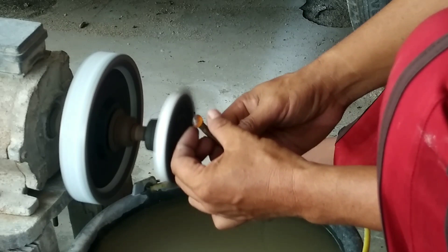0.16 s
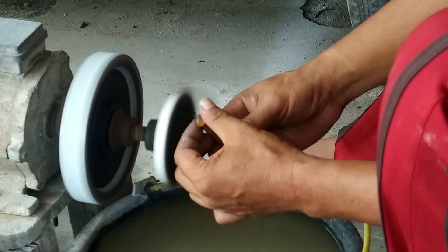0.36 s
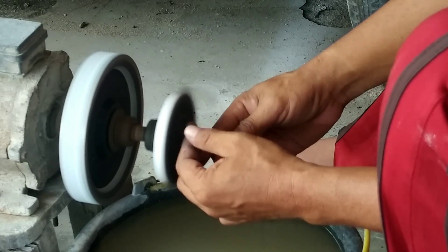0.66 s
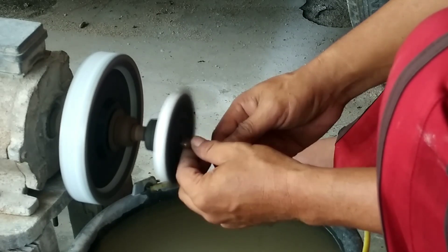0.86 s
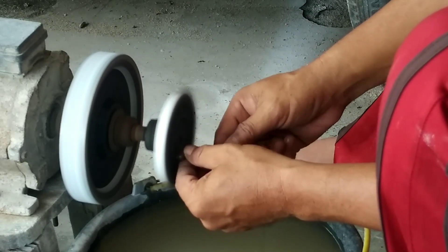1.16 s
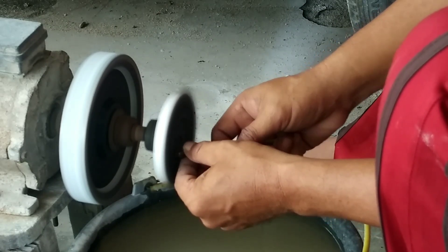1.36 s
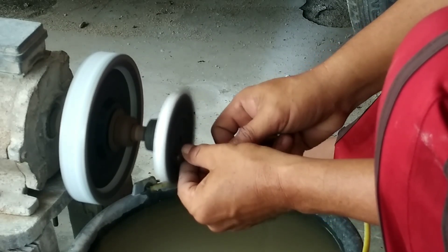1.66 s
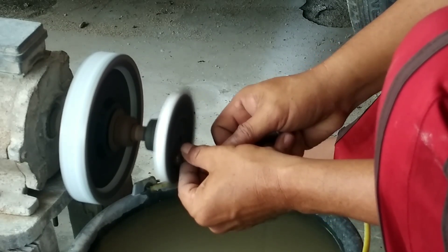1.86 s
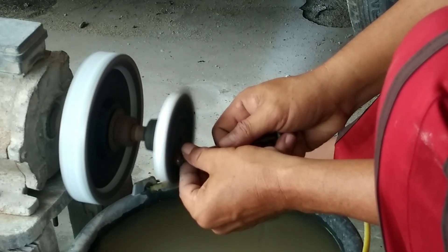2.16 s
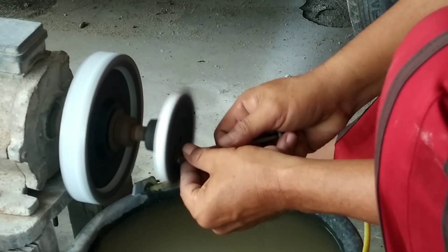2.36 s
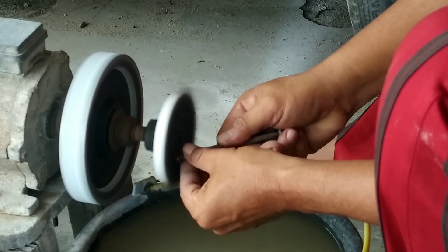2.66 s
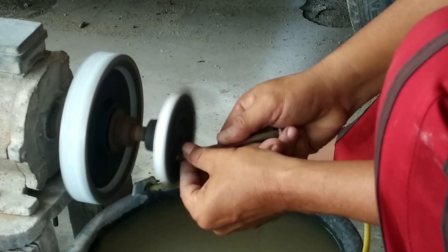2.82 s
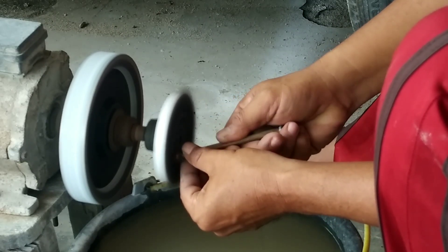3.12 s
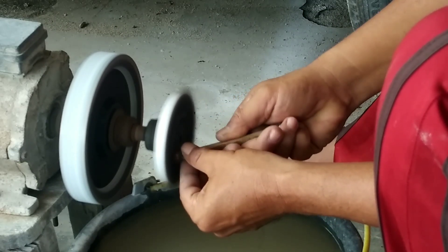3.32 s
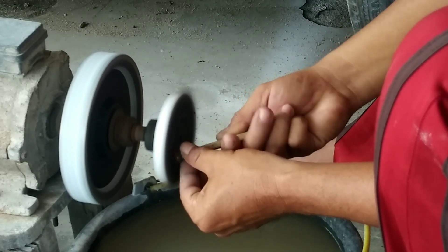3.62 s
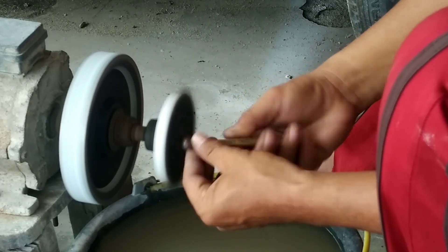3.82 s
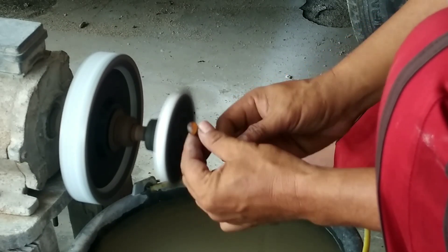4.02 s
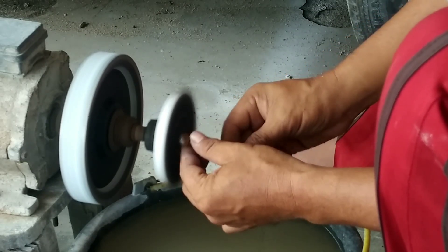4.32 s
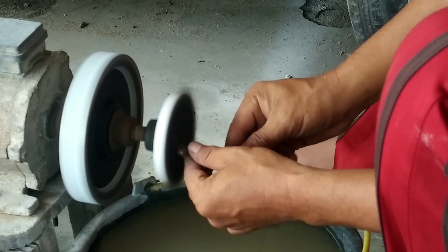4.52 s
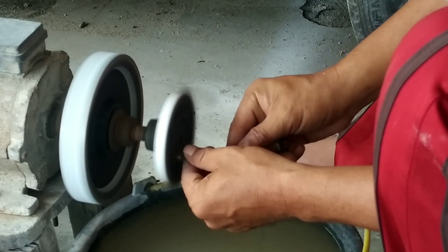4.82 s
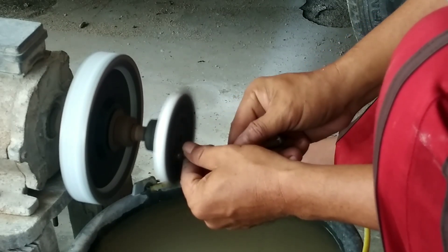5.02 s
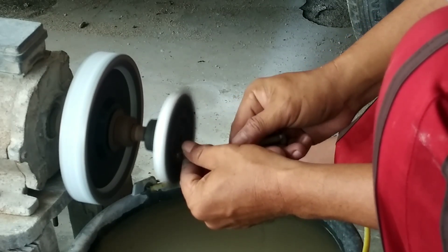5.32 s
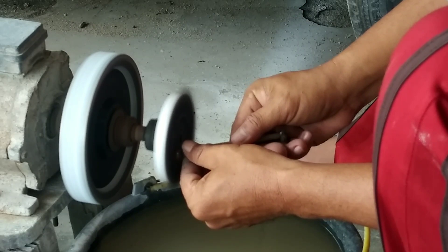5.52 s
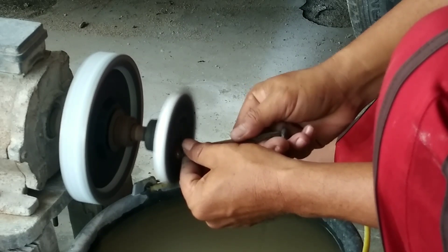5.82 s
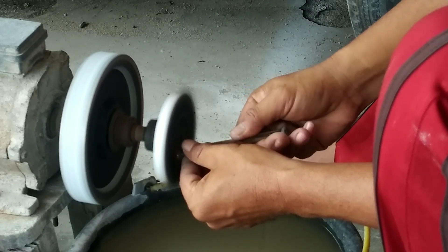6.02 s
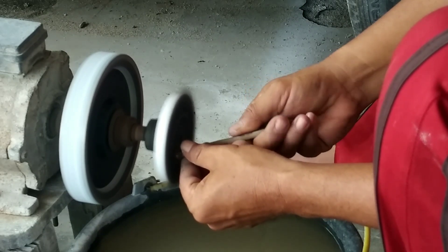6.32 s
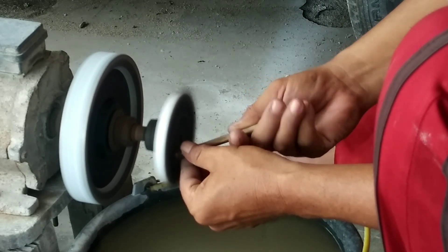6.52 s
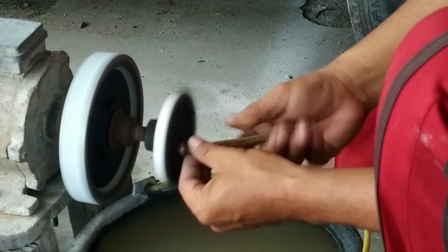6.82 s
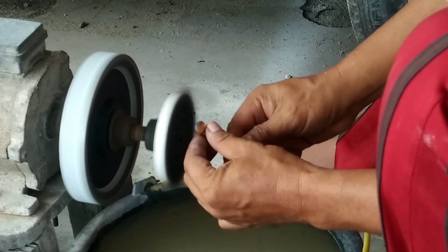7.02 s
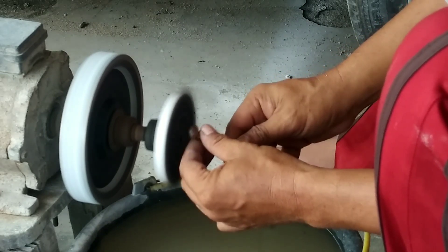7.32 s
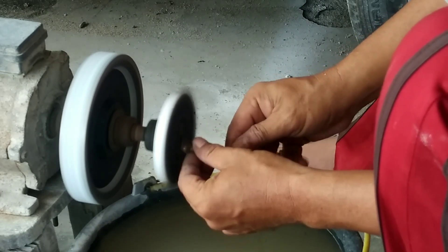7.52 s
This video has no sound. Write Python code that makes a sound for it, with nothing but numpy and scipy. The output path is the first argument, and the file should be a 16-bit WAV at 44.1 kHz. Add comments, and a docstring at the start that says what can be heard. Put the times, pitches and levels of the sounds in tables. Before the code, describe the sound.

Close in a hard workshop, a bench grinder runs without a break: a dense, nasal whine of many unsteady tones over rushing motor roar. A thin metallic ring flares up in irregular fits. A small stone touches the spinning wheel, giving faint airy hisses that swell and ease with hand pressure, strongest before three and four seconds. A distant engine hums low behind. Stereo, with dull extreme treble.

```python
"""Many unsteady tones sing over a broad roar: a bench grinder's shaft and ball bearing in their casing.
They are sums of wavering sines and shaped noise; the end shield rings in fits of narrow-band noise.
A stone on the wheel hisses under changing pressure: noise pulsing with each turn.
Behind it a far engine, a few sine orders, picks up speed and settles.
Two microphone ports hear each grinder tone with its own level and lag."""
import sys
import numpy as np
from scipy import signal
from scipy.fft import rfft, irfft, next_fast_len
from scipy.io import wavfile
from scipy.ndimage import uniform_filter1d

SR = 44100
rng = np.random.default_rng(int(sys.argv[2]) if len(sys.argv) > 2 else 0)


def generate_wav(signal):
    """Clip the signal to [-1, 1] and save it as 16-bit WAV at the path in sys.argv[1]."""
    frames = np.transpose(np.atleast_2d(signal))
    scaled = np.clip(frames, -1, 1) * 32767
    pcm = np.round(scaled).astype(np.int16)
    wavfile.write(sys.argv[1], SR, pcm)


def invert_db(x):
    """Field ratio 10**(x/20) for x, a level in decibels (scalar or array-like)."""
    u = np.asarray(x, float) / 20
    return 10 ** u


N = 338229

SHAFT_HZ, MAINS_HZ = 48.8, 100.2  # mean shaft speed; mains hum

# shaft speed: (time [s], deviation from mean [%])
SHAFT_SPEED = [(0, .01), (.5, .18), (1.4, .24), (1.85, .15), (2.35, -.09), (3.0, -.16), (3.6, -.27),
               (3.85, -.24), (4.25, .1), (4.9, .22), (5.3, .14), (5.85, -.04), (6.5, -.05), (6.9, -.11),
               (7.3, .13), (7.67, .2)]
# surge of the whole motor: (time [s], level [dB])
MOTOR_SURGE = [(0, -2), (.3, -0.5), (.55, 0.5), (.8, -1.5), (1.3, 0), (1.65, -2), (1.95, -0.2),
               (2.25, -1.5), (2.72, 0.5), (3.05, -1.5), (3.45, 0.5), (3.85, -0.7), (4.3, -2.5), (4.6, -0.6),
               (4.9, 1.5), (5.3, -0.6), (6.0, .5), (6.4, -2), (6.7, 0.5), (6.95, -1.5), (7.35, -0.7),
               (7.67, -3)]
# mains hum, shaft and ball-pass orders, cage sidebands, at mean speed:
# (frequency [Hz], left level [dB], right level [dB], left lead [rad])
MOTOR_TONES = [(MAINS_HZ, -63, -62, 0.0), (150.2, -66, -67, -0.0), (199.4, -68, -69, 0.0),
               (249.2, -58, -58, -0.3), (295.9, -61, -64, 0.4), (341.9, -59, -64, 0.4),
               (402.1, -58, -56, 0.8), (424.9, -57, -62, 0.4), (451.4, -52, -56, 1.0),
               (474.1, -56, -59, 0.8), (488.3, -50, -59, 1.0), (522.8, -60, -55, 1.2),
               (537.0, -51, -55, 1.2), (554.3, -56, -62, 1.2), (584.4, -48, -52, 1.4),
               (635.1, -48, -53, 1.5), (662.2, -55, -65, 0.2), (683.1, -53, -58, 1.7),
               (710.3, -54, -56, 2.0), (725.4, -51, -53, 1.8), (740.4, -52, -56, 2.3),
               (760.5, -40, -42, -0.0), (783.6, -54, -53, -2.5), (804.4, -49, -50, 2.2),
               (823.1, -54, -55, -0.7), (853.6, -56, -56, 0.9), (903.8, -48, -57, 1.8),
               (918.2, -45, -51, 2.8), (947.7, -41, -40, 0.9), (977.8, -50, -58, 0.1),
               (1004.6, -43, -48, -1.3), (1054.5, -63, -58, -0.2), (1071.7, -61, -57, -0.7),
               (1090.3, -62, -60, -0.4), (1104.4, -64, -61, 0.1), (1185.0, -48, -50, 0.5),
               (1205.2, -48, -54, 0.8), (1225.8, -60, -60, 3.0), (1243.5, -66, -65, -2.1),
               (1316.9, -62, -68, 0.2), (1385.7, -61, -60, 0.0), (1405.7, -52, -55, -0.4),
               (1510.4, -65, -60, -0.7), (1589.6, -57, -57, -1.1), (1608.7, -57, -58, -2.9),
               (1626.0, -54, -59, -1.4), (1687.6, -61, -63, -2.1), (1708.3, -59, -61, -2.2),
               (1791.0, -59, -53, 1.9), (1827.4, -52, -53, 0.9), (1859.3, -62, -64, -1.9),
               (1950.0, -64, -65, -2.7), (1991.9, -62, -65, -3.0), (2026.4, -61, -64, 2.9),
               (2088.7, -66, -69, 3.1), (2208.5, -63, -63, 2.7), (2406.9, -64, -67, 2.5),
               (2603.1, -66, -70, 2.8), (2663.8, -67, -68, 2.7), (2815.2, -62, -68, -3.1),
               (3017.0, -65, -63, 3.0), (3111.2, -63, -66, 2.9), (3162.8, -56, -59, 2.6),
               (3221.6, -53, -50, 2.9), (3266.9, -53, -54, 2.7), (3312.9, -58, -56, 2.9),
               (3407.5, -62, -61, 3.1), (3468.6, -66, -66, 3.1), (3615.3, -60, -60, 3.1),
               (3733.8, -63, -64, 3.1), (3870.6, -64, -63, 3.1), (4191.5, -72, -60, 2.3),
               (4290.7, -71, -58, -2.6)]
# tones with their own waver; standing waves in the room tie level to speed: tone [Hz]:
# (waver scale [dB], left slope [dB/% speed], right slope [dB/% speed], surge slope [dB/dB])
STEADY_TONES = {MAINS_HZ: (1, 0, 0, 0), 249.2: (1, 0, 0, 0), 584.4: (2.5, 0, -2, 1.7),
                635.1: (1.7, 6.1, 12, .3), 760.5: (0.82, 14.5, 1.8, 0.36), 947.7: (1, -3, -13.5, 0.84),
                1004.6: (2.5, -2, 20, 3.1), 1185.0: (1.5, -3.5, 3, 0.6), 1205.2: (2.5, -9, 10, -0.2),
                1405.7: (2.2, -2, -11.5, 0.5), 1827.4: (1.2, 5, -8, .6), 1626.0: (2, -4, -20.5, 1),
                918.2: (2, -8.5, -4, 1)}
# close neighbours beating with a tone: tone [Hz]: [(offset [Hz], depth under tone [dB])]
TONE_BEATS = {249.2: [(-2.75, 9), (-5.5, 7)], 584.4: [(-1.2, 3), (1.1, 4), (3.6, 6)], 635.1: [(2.75, 3)],
              760.5: [(6.4, 12)], 918.2: [(1.1, 4), (-2.3, 10)], 947.7: [(-9.4, 15)], 1004.6: [(1.1, 10),
              (2.8, 13)], 1185.0: [(1.1, 12)], 1205.2: [(1.1, 11)], 1827.4: [(1.8, 3)]}
# end shield resonance: (centre [Hz], width [Hz])
END_SHIELD = (3261, 178)
# strong ringing fits of the end shield: (time [s], peak over usual ring [dB], Gaussian length [s])
SHIELD_FITS = [(0.274, 3, .08), (0.53, 10, .14), (.88, 10.5, 0.033), (1.24, 8.5, 0.091), (1.788, 7.5, 0.11),
               (1.968, 6.5, 0.055), (2.75, 3.5, 0.088), (3.895, 3, .08), (4.63, 7.5, 0.047),
               (4.896, 10, 0.05), (5.53, 3.5, .08), (6.148, 4, .15), (6.66, 4, .08), (6.964, 3.5, .06),
               (7.2, 4, 0.091), (7.362, 3.5, .06)]
# stone on the wheel: (time [s], pressure re a hard push [dB])
STONE_PRESSURE = [(0.02, -18), (1.33, -16), (1.37, -7.5), (1.43, -6.5), (1.49, -13.5), (1.75, -11.5),
                  (2.09, -11.5), (2.16, -5), (2.22, -10), (2.52, -1.5), (2.58, -4), (2.7, 2.5),
                  (3.01, -7.5), (3.22, -10.5), (3.28, -5.5), (3.61, -7.5), (3.82, 1.5), (3.92, -13),
                  (4.21, -19), (4.93, -15), (5.02, -5), (5.12, -4.5), (5.28, -13), (5.42, -9), (5.78, -9.5),
                  (5.9, -4.5), (6.2, -5.5), (6.4, -4), (6.6, -9), (6.9, -11.5), (6.96, -16.5), (7.67, -16)]
# stone hiss spectrum, relative within each band: (frequency [Hz], left level [dB], right level [dB])
STONE_HISS = [(3000, -38, -38.5), (3680, -26, -24), (3830, 1, 3), (4470, -3.5, 9.5), (7000, -18, -3),
              (10300, 0.5, 8), (12300, 1, 9), (13200, -2.5, -12.5), (14000, -15, -9)]
# casing and air roar, before resonances: (frequency [Hz], left density [dB/Hz], right density [dB/Hz])
ROAR_SPECTRUM = [(30, -100, -101), (65, -99, -96), (86, -90.5, -93), (117, -81, -79.5), (170, -86.5, -99.5),
                 (298, -83.5, -85), (400, -73, -74.5), (880, -73.5, -71.5), (950, -70.5, -73.5),
                 (1270, -76.5, -84), (1590, -76.5, -77.5), (1814, -73.5, -72), (2255, -85, -87.5),
                 (2670, -79.5, -83.5), (2770, -84, -84.5), (3450, -80, -80), (3760, -80, -80),
                 (3880, -77.5, -82.5), (4015, -88, -75.5), (4740, -97.5, -88.5), (5880, -100.5, -87),
                 (6910, -103, -90.5), (8100, -105, -115.5), (11100, -100, -93), (14000, -110, -110)]
# casing resonances lifting the roar: (centre [Hz], width [Hz], lift [dB])
CASING_MODES = [(4350, 130, 6.5), (6062, 76, 16.5), (6270, 53, 9.5), (6290, 130, 9.5)]
# far engine: (time [s], firing rate [Hz], reference level [dB])
ENGINE_RUN = [(0, 26.6, -56), (.7, 26.7, -53.5), (1.2, 29, -61), (1.8, 30.2, -59.5), (2.4, 31.5, -65),
              (3.4, 32.9, -62), (4.0, 32.8, -71), (4.5, 33.2, -60), (5.4, 33, -65.5), (7.67, 33, -64)]
# engine orders: (multiple of firing rate [-], level re reference [dB])
ENGINE_HARMONICS = [(3, -17), (4, -7), (5, -10), (6, -18.5), (7, -17.5)]
# room mode lifting passing engine orders: (centre [Hz], width [Hz], lift [dB])
ROOM_BOOM = (133, 5.2, 10.5)
# port pair, for noise: (frequency [Hz], likeness [0-1], left lead [rad])
PORT_PAIR = [(40, .8, 0), (70, .97, 0), (140, .96, 0), (250, .85, .3), (750, .85, 1.8), (1000, .5, .3),
             (1300, .5, 0), (1900, .65, -2.8), (2400, .75, -3.5), (2900, .55, -3.3), (3300, .95, -3.3),
             (3450, 1, -np.pi), (3760, 1, -np.pi), (3850, .9, -3.1), (4000, .3, -2.6), (5000, .25, 0),
             (7600, .2, 2.4), (10000, .45, .2), (12000, .5, 3.1)]
# microphone response: (frequency [Hz], gain [dB])
MIC_RESPONSE = [(7700, 0), (8050, -19.5), (8250, -55), (8850, -55), (9100, -23.5), (14000, -24.5)]


def unit(x):
    """Scaled to rms 1."""
    return x / np.sqrt(np.mean(np.abs(x) ** 2) + 1e-20)


def along(points, hz):
    """Table columns after the frequency, interpolated on a log-frequency axis."""
    f, *cols = np.transpose(points)
    return np.array([np.interp(np.log(hz + 1), np.log(f + 1), c) for c in cols])


def curves(rows):
    """Table columns after the time, one value per sample."""
    s, *cols = np.transpose(rows)
    return [np.interp(np.arange(N) / SR, s, c) for c in cols]


def wobble(rate_hz):
    """Random curve, linear between rate_hz normal knots a second."""
    knots = rng.standard_normal(400)
    return np.interp(np.arange(N) * rate_hz / SR, np.arange(len(knots)), knots)


def per_turn(multiple, run_s):
    """Cosine with `multiple` cycles per shaft turn."""
    return np.cos(2 * np.pi * multiple * SHAFT_HZ * run_s)


def filtered(x, response):
    """x filtered by a complex response(hz)."""
    m = next_fast_len(N + 8192)
    return irfft(rfft(x, m) * response(np.fft.rfftfreq(m, 1 / SR)), m)[..., :N]


def rush(gain, patchy_db):
    """Patchy noise at both ports, partly alike and lagged by PORT_PAIR; gain(hz) has a row per port."""
    z = signal.stft(rng.standard_normal((2, N + 512)), nperseg=512)[2]
    field = uniform_filter1d(rng.standard_normal(z.shape[1:]), size=5, axis=0)
    field = uniform_filter1d(field, size=10, axis=1)
    a, b = signal.istft(z * invert_db(patchy_db * unit(field)), nperseg=512)[1][:, :N]

    def mix_angle(hz):
        return np.arccos(np.clip(along(PORT_PAIR, hz)[0], 0, 1)) / 2

    def port_gain(hz):
        return gain(hz) * np.exp(.5j * along(PORT_PAIR, hz)[1] * [[1], [-1]])

    shared = filtered(a, lambda hz: port_gain(hz) * np.cos(mix_angle(hz)))
    opposed = filtered(b, lambda hz: port_gain(hz) * np.sin(mix_angle(hz)) * [[1], [-1]])
    return shared + opposed


def turns():
    """Shaft rotation as seconds of mean-speed running: integral of relative speed."""
    speed_pct = uniform_filter1d(curves(SHAFT_SPEED)[0], size=SR // 5)
    return np.cumsum(1 + speed_pct / 100) / SR


def ringing():
    """End shield level over its usual ring, dB: strong fits on a random waver."""
    t = np.arange(N) / SR
    waver_db = wobble(7) + 0.9 * wobble(22)
    return waver_db + sum(db * np.exp(-((t - s) / length_s) ** 2) for s, db, length_s in SHIELD_FITS)


def tones(run_s, shield_db):
    """Motor tones: slipping balls waver level and phase; all but the mains hum track shaft speed."""
    speed_pct = (np.gradient(run_s) * SR - 1) * 100
    surge_db = curves(MOTOR_SURGE)[0]
    out = np.zeros((2, N))
    for hz, left_db, right_db, lead_rad in MOTOR_TONES:
        slip_rad = np.clip(.2 + hz / 9000, 0, .4) * wobble(6) + .1 * wobble(25)
        ports_db = np.array([[left_db], [right_db]])
        if hz in STEADY_TONES:
            waver_db, left_slope, right_slope, surge_slope = STEADY_TONES[hz]
            level_db = waver_db * (wobble(2.074) + 0.67 * wobble(20)) + surge_slope * surge_db
            slip_rad = 0.57 * slip_rad
            ports_db = ports_db + np.outer([left_slope, right_slope], speed_pct)
        else:
            level_db = 3.06 * wobble(4) + 2.0 * wobble(11) + .8 * surge_db
            if abs(END_SHIELD[0] - hz) < END_SHIELD[1]:  # passes through the end shield
                level_db = .4 * level_db + 0.65 * shield_db
        beat = 1
        for offset_hz, under_db in TONE_BEATS.get(hz, []):
            beat = beat + invert_db(-under_db) * np.exp(2j * np.pi * (offset_hz * run_s + rng.uniform()))
        clock_s = np.arange(N) / SR if hz == MAINS_HZ else run_s
        phase_rad = 2 * np.pi * hz * clock_s + slip_rad + rng.uniform(0, 2 * np.pi)
        tone = unit(invert_db(level_db) * beat) * np.exp(1j * phase_rad)
        port_lead = np.exp(.5j * lead_rad * np.array([[1], [-1]]))
        out += np.sqrt(2) * np.real(tone * invert_db(ports_db) * port_lead)
    return invert_db(-0.44 + 0.78 * wobble(9) + 0.25 * wobble(20)) * out


def ring(run_s, shield_db):
    """End shield: resonant noise, knocked by the bearing mainly twice a turn, ringing in fits."""
    centre_hz, width_hz = END_SHIELD

    def resonance(hz):
        return np.ones((2, 1)) / (1 + (2 * (hz - centre_hz) / width_hz) ** 4)

    noise = unit(rush(resonance, patchy_db=2.5))
    knock = 1 + 0.047 * per_turn(1, run_s) + 0.1 * per_turn(2, run_s)
    return invert_db(-48 + shield_db) * unit(knock) * noise


def stone(run_s):
    """Stone: gritty noise, harder at the untrue wheel's high spots; pressure lifts treble more."""
    split_hz = 8500
    scrape_db, scrape_slope, treble_db = -44.5, 0.86, -42  # levels at 0 dB pressure; slope in dB/dB
    press_db = curves(STONE_PRESSURE)[0] + wobble(16)  # unsteady hand
    high_spot = np.exp(0.19 * per_turn(1, run_s) + 0.23 * per_turn(4, run_s) + 0.057 * wobble(40))
    grit = np.exp(0.24 * np.repeat(rng.standard_normal(N // 32 + 1), 32)[:N])
    scrape = unit(rush(lambda hz: invert_db(along(STONE_HISS, hz)) * (hz < split_hz), patchy_db=1.5))
    treble = unit(rush(lambda hz: invert_db(along(STONE_HISS, hz)) * (hz > split_hz), patchy_db=2))
    scrape = invert_db(scrape_db + scrape_slope * press_db) * scrape
    treble = invert_db(treble_db + press_db + 1.5 * wobble(17)) * treble
    return unit(high_spot * grit) * (scrape + treble)


def roar(run_s):
    """Fan air and bearing rumble: noise through casing and dense room modes, throbbing each turn."""
    knots = rng.standard_normal(1000)

    def room(hz):  # one random knot per 16 Hz
        return invert_db(2.2 * np.interp(hz / 16, np.arange(len(knots)), knots))

    def casing(hz):
        return 1 + sum((invert_db(db) - 1) / (1 + (2 * (hz - c) / w) ** 2) for c, w, db in CASING_MODES)

    def gain(hz):  # sqrt(SR / 2): density to white-noise gain
        return invert_db(along(ROAR_SPECTRUM, hz)) * casing(hz) * room(hz) * np.sqrt(SR / 2)

    noise = rush(gain, patchy_db=2.0)
    waver_db = 0.38 * wobble(6) + 0.23 * wobble(16) + 1.03 * wobble(40)
    return noise * invert_db(curves(MOTOR_SURGE)[0] + waver_db + 0.49 * per_turn(1, run_s))


def engine():
    """Far engine: wavering sine orders of the firing rate, lifted by a room mode, alike at both ports."""
    firing_hz, level_db = curves(ENGINE_RUN)
    cycles = np.cumsum(firing_hz) / SR
    centre_hz, width_hz, lift_db = ROOM_BOOM
    out = np.zeros(N)
    for k, order_db in ENGINE_HARMONICS:
        boom_db = lift_db / (1 + (2 * (k * firing_hz - centre_hz) / width_hz) ** 2)
        gain = invert_db(level_db + order_db + boom_db + 1.5 * wobble(4.4))
        out += gain * np.sin(2 * np.pi * (k * cycles + rng.uniform()))
    return np.sqrt(2) * out


def scene():
    """Sum of motor, stone and far engine at the two ports."""
    run_s, shield_db = turns(), ringing()
    motor = tones(run_s, shield_db) + ring(run_s, shield_db) + roar(run_s)
    return motor + stone(run_s) + engine()


def top_cut(x):
    """Nothing passes above the cut-off."""
    return signal.sosfilt(signal.butter(12, 13460, fs=SR, output="sos"), x)


def record(dry):
    """Microphone: response falls steeply above about 8 kHz."""
    mix = filtered(dry, lambda hz: invert_db(along(MIC_RESPONSE, hz)[0]))
    return top_cut(mix)


dry = scene()
out = record(dry)
generate_wav(out)
```